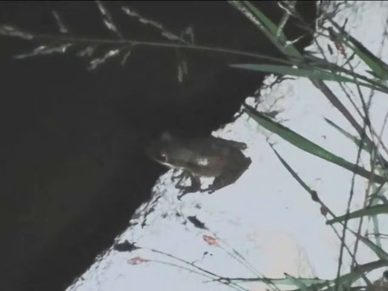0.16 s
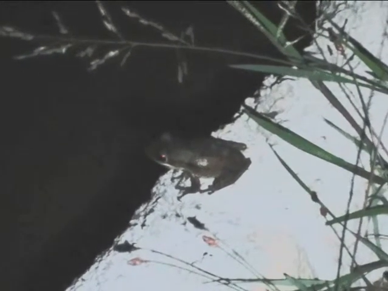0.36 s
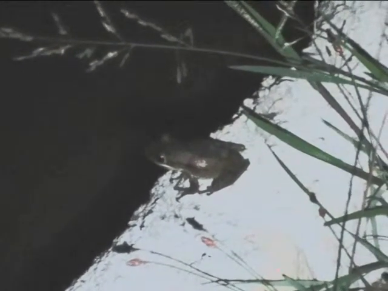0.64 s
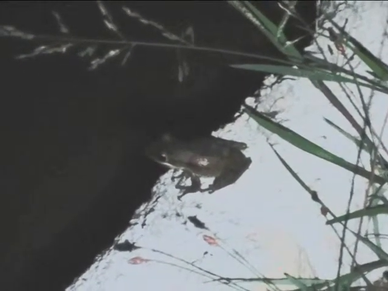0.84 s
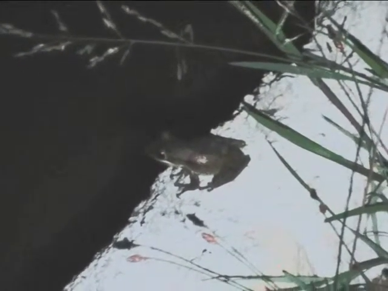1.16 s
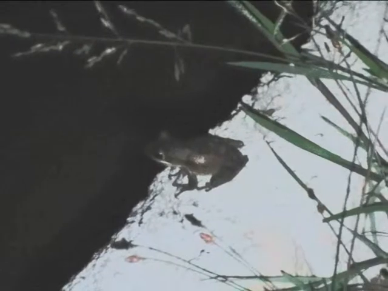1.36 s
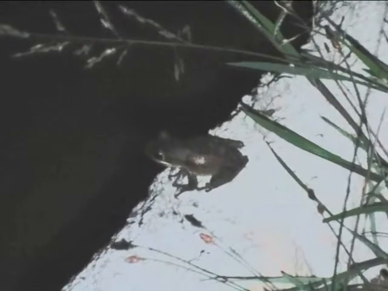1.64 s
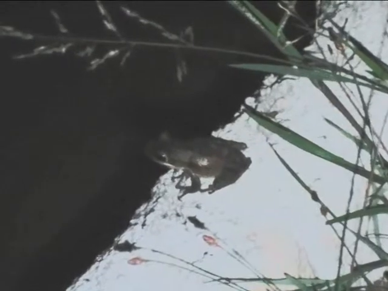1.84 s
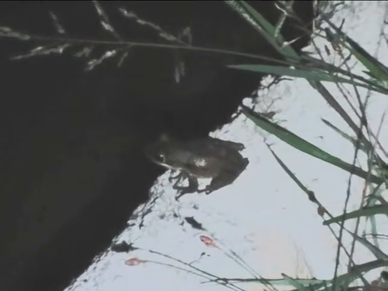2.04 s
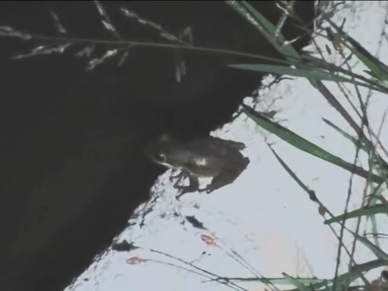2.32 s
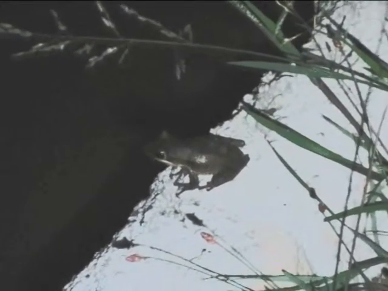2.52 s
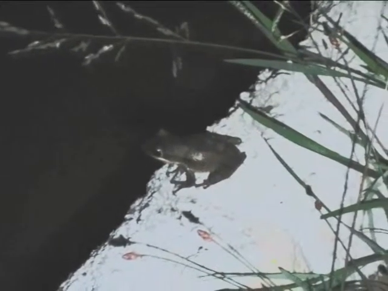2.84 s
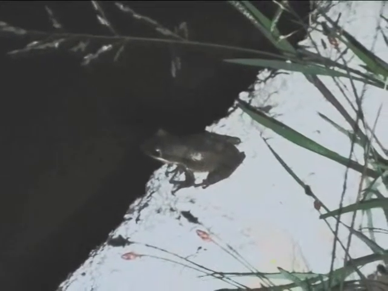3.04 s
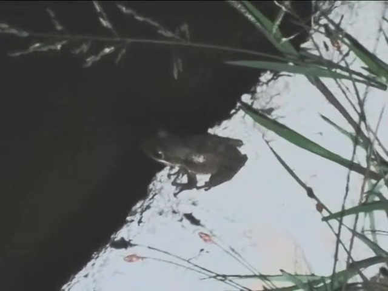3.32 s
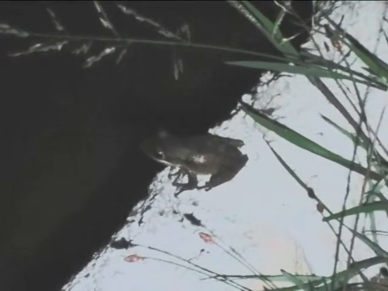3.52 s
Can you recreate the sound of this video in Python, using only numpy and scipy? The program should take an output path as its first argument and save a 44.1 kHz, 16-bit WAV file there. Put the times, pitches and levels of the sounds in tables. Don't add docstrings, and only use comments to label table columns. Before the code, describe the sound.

Loud, shrill, fast-pulsed frog trill over short rattling croaks and a hissing night chorus

```python
import sys
import numpy as np
from scipy import signal
from scipy.io import wavfile
from scipy.ndimage import uniform_filter1d

SR = 44100
rng = np.random.default_rng(int(sys.argv[2]) if len(sys.argv) > 2 else 0)


def voltage_ratio(level):
    return 10 ** (np.asarray(level, float) / 20)


def bounce(signal):
    frames = np.transpose(np.atleast_2d(signal))
    limited = np.clip(frames, -1, 1)
    pcm = np.round(limited * 32767).astype(np.int16)
    wavfile.write(sys.argv[1], SR, pcm)


N = 162288


def evened(x):
    return x / np.sqrt(np.mean(x ** 2) + 1e-20)


def add(mix, start_s, sound):
    part = mix[max(round(start_s * SR), 0):][:len(sound)]
    part += sound[:len(part)]


def resonate(x, hz, width_hz):
    turn = np.exp(2j * np.pi * np.cumsum(hz * np.ones(len(x))) / SR)
    r = np.exp(-np.pi * width_hz / SR)
    at_zero_hz = x / turn + 1e-18
    return 2 * (turn * signal.lfilter([(1 - r) ** 2], [1, -2 * r, r * r], at_zero_hz)).real


def place(x, pan_db, wet_db, t60):
    t = np.arange(8000) / SR
    tail = rng.standard_normal((2, 8000)) * voltage_ratio(-60 * t / t60) * (t > .003)
    wet = signal.fftconvolve(x[None], tail / np.linalg.norm(tail[0]), axes=1)[:, :N]
    return x * voltage_ratio(np.array([[pan_db / 2], [-pan_db / 2]])) + voltage_ratio(wet_db) * wet


RISE_MS = 2.81

# (t/ms, level/dB, f/Hz)
PULSE_SHAPE = [(-17, -4.6, 3610), (-13, -3.5, 3540), (-8, 0, 3445), (-4.6, -1.2, 3355), (-1.5, -4.9, 3260),
               (.3, -11, 3140), (3.2, -12, 3175), (5.4, -25, 3210), (9.5, -45, 3250)]
# (band f/Hz, width/Hz, peak level/dB, skirt level/dB)
SAC_BANDS = [
    (6480, 170, -21, -52),
    (10300, 300, -28.5, -45),
    (13500, 700, -36, -42),
]


def whistle(level_db, ratio, onset_ms, rise_ms):
    ms = np.arange(-25 * SR // 1000, 10 * SR // 1000) * 1000 / SR
    at, db, hz = np.transpose(PULSE_SHAPE)
    since = np.maximum(ms - onset_ms, 0)
    hook_hz = 192 * ratio ** 40 * np.exp(-since / 1.76)
    hz = ratio * np.interp(ms, at, hz) + hook_hz
    turns = 2 * np.pi * (np.cumsum(hz) / SR + rng.random())
    tone = np.sin(turns)
    before_fall = np.clip(2.3 - ms, 0, 1)
    for k, (band_hz, width, peak_db, skirt_db) in enumerate(SAC_BANDS, 2):
        band = np.exp(-.5 * ((k * hz - band_hz) / width) ** 2)
        tone += (voltage_ratio(skirt_db) + voltage_ratio(peak_db) * band) * np.sin(k * turns) * before_fall
    rise = np.minimum(since / rise_ms, 1) ** 1.3
    swell = voltage_ratio(uniform_filter1d(np.interp(ms, at, db), size=30))

    air = rng.standard_normal(len(ms))
    air = voltage_ratio(-20) * resonate(air, 5000, 4400) + voltage_ratio(-36) * np.diff(air, prepend=0)
    snap_db = 1.8 * (RISE_MS - rise_ms)
    tick = voltage_ratio(snap_db + 1.5 * rng.standard_normal()) * air * since * np.exp(-since / 1.45)
    echo = voltage_ratio(-43) * np.exp(-((ms - 6.6) / 2.4) ** 2) * np.sin(2 * np.pi * 13000 * ms / 1000)
    return voltage_ratio(level_db) * (rise * swell * tone + tick + echo)


def grit(x):
    level = np.sqrt(abs(uniform_filter1d(x ** 2, size=900)))
    level *= voltage_ratio(3.5 * evened(uniform_filter1d(rng.standard_normal(N), size=200)))
    noise = rng.standard_normal(N) + 0.33 * rng.standard_normal((2, N))
    bright = signal.lfilter(*signal.butter(2, [4040, 12700], "band", fs=SR), noise)
    return voltage_ratio(-32.5) * level * bright


# (t/s, pulse number)
TRILL_CLOCK = [(0.3301, 0), (0.4038, 2), (0.4735, 4), (0.5404, 6), (0.6089, 8), (0.6769, 10), (0.7461, 12),
               (0.8147, 14), (0.8845, 16), (0.9549, 18), (1.0247, 20), (1.0966, 22), (1.1671, 24),
               (1.2378, 26), (1.3099, 28), (1.3849, 30), (1.4594, 32), (1.5313, 34), (1.6029, 36),
               (1.6755, 38), (1.7461, 40), (1.8183, 42), (1.8897, 44), (1.9616, 46), (2.0335, 48),
               (2.1052, 50), (2.1784, 52), (2.2516, 54), (2.3256, 56), (2.3953, 58), (2.4684, 60),
               (2.5404, 62), (2.6118, 64), (2.6819, 66), (2.7529, 68), (2.8257, 70), (2.8968, 72),
               (2.9678, 74), (3.0388, 76), (3.1117, 78), (3.1839, 80), (3.2561, 82), (3.3274, 84),
               (3.4014, 86), (3.4728, 88), (3.5448, 90), (3.6178, 92), (3.6549, 93)]
# (pulse number, level/dB)
TRILL_EFFORT = [(0, -9.5), (1, -6.5), (2, -2.5), (7, -4), (18, -3.5), (23, -5.5), (25, -3.5), (66, -4),
                (76, -3.5), (79, -5.5), (80, -4), (94, -3.5)]
# (pulse number, delay t/ms)
OPENING_DELAY = [(0, 2.1), (1, 2.1), (3, 1.1), (5, 1.1), (6, 2.5), (12, 1.2), (13, 1.5), (14, 2.6),
                 (15, 0.8), (17, -1.0), (20, 1.5), (21, 0.9), (23, 1.9), (29, -1.1), (30, -1.3), (31, -1.4),
                 (32, -1.9), (33, 1.0), (36, -1.3), (42, -2.1), (43, -1.1), (44, -1.2), (46, 1.1),
                 (47, -1.3), (49, -1.1), (51, -1.6), (60, -1.6), (65, 1.5), (66, 1.9), (69, 1.5), (73, 1.2),
                 (74, 1.5), (86, 1.9), (87, -1.0), (90, -1.2), (93, -0.9)]


def trill():
    s, number = np.transpose(TRILL_CLOCK)
    k = np.arange(95)
    past_end = s[-1] + (k - number[-1]) / 28
    times = np.where(k > number[-1], past_end, np.interp(k, number, s))
    effort_db = np.interp(k, *np.transpose(TRILL_EFFORT))
    chance, out = rng.standard_normal((95, 4)), np.zeros(N)
    delays = dict(OPENING_DELAY)
    for i in k:
        time_luck, level_luck, onset_luck, pitch_luck = chance[i]
        late_ms = delays.get(i, np.clip(onset_luck, -2, 2))
        flat = 0.0373 * np.exp(-i / 1.4)
        ratio = (1 - flat) * (1 + 0.0039 * pitch_luck)
        rise_ms = max(RISE_MS - late_ms * (i > 1) + 3 * (i < 2), .8)
        pulse = whistle(effort_db[i] + .35 * level_luck, ratio, -21 + late_ms, rise_ms)
        add(out, times[i] + .0012 - 25 / 1000 + 0.0003 * time_luck, pulse)
    return place(out, -0.72, -23, 0.17) + grit(out)


def croaks(calls, body, first_gap, lead_db, arch_db, peak_at, rough, double):
    out = np.zeros(N)
    for s, db, per_s, length in calls:
        count = round(length * per_s)
        k, chance = np.arange(count), rng.standard_normal((20, 4))[:count]
        at = (k - first_gap * (k > 1) + .04 * chance[:, 0] * (k > 2)) / per_s
        click_db = -arch_db * (k / (count - 1) - peak_at) ** 2 + 1.75 * chance[:, 1]
        click_db += lead_db * (k == 0) - 6.5 * (k == count - 1)
        clicks = voltage_ratio(click_db)
        drive = np.zeros(9000)
        drive[(at * SR).astype(int)] = clicks
        second = ((at + .004 + .0008 * chance[:, 2]) * SR).astype(int)
        drive[second] = double * clicks * np.clip(chance[:, 3], -1.3, 1.3)
        breath = rng.standard_normal(9000) * uniform_filter1d(abs(drive), size=300, origin=140) * 18
        edge = np.diff(drive, prepend=0) * 4
        drive = edge + drive - uniform_filter1d(drive, size=60) + rough * breath

        along = np.minimum(np.arange(9000) / (at[-1] * SR), 1)
        call = np.zeros(9000)
        for j, (hz, width, g_db, glide, fade_db) in enumerate(body):
            ring = resonate(drive, hz * (1 + (glide - 1) * along), width) / width
            call += (-1) ** j * voltage_ratio(g_db + fade_db * along) * ring
        add(out, s - 1 / per_s, voltage_ratio(db + 3.5) * call / abs(call).max())
    return out


# (first pulse t/s, level/dB, pulse rate f/Hz, length t/s)
SHARP_CALLS = [
    (0.5355, -14, 92, .115),
    (1.3875, -14.5, 95, 0.14),
    (1.7695, -14, 92, .13),
    (2.1621, -14, 82, .13),
    (2.6694, -15, 94, .13),
    (3.0424, -13, 103, .127),
    (3.5337, -14.5, 99, .127),
]
# (f/Hz, width/Hz, level/dB, glide ratio, level change over the call/dB)
SHARP_THROAT = [
    (1323, 413, 7, 1.064, -8),
    (1770, 243, 1, 1.083, 4),
    (867, 156, -3.5, 0.944, -16),
]


def sharp_croaker():
    return croaks(SHARP_CALLS, SHARP_THROAT, first_gap=0.249, lead_db=-5.5, arch_db=17.5, peak_at=0.55,
                  rough=.15, double=.12)


# (first pulse t/s, level/dB, pulse rate f/Hz, length t/s)
RINGING_CALLS = [
    (0.41, -17, 79, 0.11),
    (0.8694, -19, 86, 0.13),
    (1.241, -18.5, 81, 0.12),
    (1.5673, -18.5, 82, 0.12),
    (1.9754, -18.5, 84, 0.12),
    (2.526, -18, 76, 0.12),
    (2.841, -18, 75, 0.12),
    (3.211, -18, 80, 0.12),
]
# (f/Hz, width/Hz, level/dB, glide ratio, level change over the call/dB)
RINGING_THROAT = [
    (1342, 404, 6, 0.99, -3),
    (1764, 112, 2.4, 1.01, 2),
    (781, 128, 0.5, 1.187, -14),
    (1950, 480, -8, 1.088, 14),
]


def ringing_croaker():
    return croaks(RINGING_CALLS, RINGING_THROAT, first_gap=0.15, lead_db=-7.5, arch_db=24, peak_at=0.43,
                  rough=.15, double=.1)


# (first pulse t/s, level/dB, pulse rate f/Hz, length t/s)
HOARSE_CALLS = [
    (.986, -11.5, 80, 0.15),
]
# (f/Hz, width/Hz, level/dB, glide ratio, level change over the call/dB)
HOARSE_THROAT = [
    (1330, 580, 3, 1.09, -2.5),
    (1750, 280, -1.5, 1.08, 1.5),
    (2120, 280, -12, 1.057, 8.5),
    (686, 370, -1, 0.65, -17.5),
]


def hoarse_croaker():
    return croaks(HOARSE_CALLS, HOARSE_THROAT, first_gap=0.38, lead_db=-11, arch_db=28, peak_at=0.7,
                  rough=.45, double=.65)


# (t/s, level/dB)
CLUCK_TIMES = [
    (0.2, -12),
    (2.356, -12),
]
# (delay t/s, level/dB)
CLUCK_RATTLE = [
    (0.0526, -12),
    (.0015, 6.5),
    (.0072, 3),
    (.011, -3),
    (.0188, 2),
    (.0225, -1),
    (.0265, -0.5),
    (.0365, -8),
    (0.04, -6),
    (.0452, -5.5),
]
# (f/Hz, width/Hz, level/dB)
CLUCK_THROAT = [
    (674, 134, -7.5),
    (945, 400, -4),
    (1400, 360, 4),
    (1925, 150, -10),
]


def clucks():
    out, drive = np.zeros(N), np.zeros(5000)
    for s, db in CLUCK_RATTLE:
        add(drive, s, voltage_ratio(db) * np.ones(1))
    for s, db in CLUCK_TIMES:
        breath = rng.standard_normal(5000) * uniform_filter1d(drive, size=400, origin=190) * 4
        rattle = drive + 1.8 * breath
        call = np.zeros(5000)
        for k, (hz, width, g_db) in enumerate(CLUCK_THROAT):
            call += (-1) ** k * voltage_ratio(g_db) * resonate(rattle, hz, width) / width
        add(out, s, voltage_ratio(db + 4.0) * call / abs(call).max())
    return place(out, -2.3, -9.5, 0.086)


# (t/s, level/dB, f/Hz, width/Hz)
WATER_KNOCKS = [(.956, 4.5, 1950, 300), (.958, -5.5, 1660, 100), (.97, -6, 1900, 240),
                (.977, -24, 2300, 300), (1.448, -33.5, 810, 13), (1.47, -27, 817, 18), (.73, -42, 487, 110),
                (2.334, -37, 610, 130), (1.237, -41, 517, 110), (.52, -24.5, 620, 150),
                (.546, -17, 587, 150), (0.571, -22, 590, 140), (.986, -27, 586, 130),
                (1.008, -33, 507, 140), (1.029, -23, 585, 140), (1.252, -24, 624, 130),
                (1.266, -25, 575, 110), (1.278, -22.5, 600, 130), (1.331, -22.5, 530, 66),
                (1.607, -32.5, 530, 72), (1.686, -28, 516, 91), (1.761, -26, 500, 105),
                (1.835, -24, 515, 104), (2.105, -32.5, 630, 73)]


def knocks():
    out, t = np.zeros(N), np.arange(3000) / SR
    for s, db, hz, width in WATER_KNOCKS:
        upper = 0.5 * np.exp(-t / 0.0045) * np.sin(2 * np.pi * 1.283 * hz * t)
        ring = np.sin(2 * np.pi * hz * t) + upper
        rise = np.minimum(t / 0.0011, 1) ** 2
        add(out, s, voltage_ratio(db + 1.5) * rise * np.exp(-np.pi * width * t) * ring)
    return place(signal.lfilter(*signal.butter(2, 330, "high", fs=SR), out), -1.7, -15, 0.17)


# (t of a pulse/s, pulse rate f/Hz, level/dB, f/Hz, pulse width as share of the period)
FAR_FROGS = [
    (0.0243, 26.2, -26.5, 3420, 0.15),
    (0.01743, 22, -21, 3330, 0.026),
]


def far_trill():
    t, tone = np.arange(N) / SR, 0
    for s, per_s, db, hz, share in FAR_FROGS:
        cycle = ((t - s) * per_s + .5) % 1 - .5
        falling = np.sin(2 * np.pi * np.cumsum(hz - 450 * cycle) / SR)
        tone = tone + voltage_ratio(db) * np.exp(-(cycle / share) ** 2) * falling
    return place(tone, 0.55, -4.0, 0.046)


# (t/s, length t/s, level/dB)
RASP_CALLS = [
    (.3, 0.23, -35.5),
    (0.848, 0.14, -40),
    (2.025, 0.14, -37),
    (3.195, 0.3, -37),
]


def rasps():
    out = np.zeros(N)
    for s, length, db in RASP_CALLS:
        t = np.arange(0, length, 1 / SR)
        puffs = (0.15 + np.exp(-(t * 56 % 1) / 0.22)) * rng.standard_normal(len(t))
        swell = np.sin(np.pi * t / length) ** 0.38
        add(out, s, voltage_ratio(db) * swell * evened(resonate(puffs, 2640, 650)))
    return place(out, .3, -7.5, 0.075)


def cricket():
    start_s, every_s, buzz_s = 0.14, .3595, 0.23
    u = (np.arange(N) / SR - start_s) % every_s
    per_s = np.interp(u, [0, .05, .08], [110, 110, 165])
    strokes_done = np.cumsum(per_s * (1 + 1.6 * rng.standard_normal(N))) / SR
    strokes = np.maximum(np.diff(np.floor(strokes_done), prepend=0), 0)
    strokes = strokes * (u < buzz_s) * np.minimum(0.27 + u / 0.12, 1)
    strokes = strokes * voltage_ratio(1.2 * rng.standard_normal(N))
    return place(voltage_ratio(-50) * evened(resonate(strokes, 7270, 240)), -0.48, -1.5, 0.053)


# (f/Hz, level per Hz/dB)
POND_HISS = [
    (110, -21.5),
    (300, -19),
    (1300, -12),
    (2200, -10),
    (4000, -13),
    (9000, -33.5),
    (12000, -28),
    (15500, -51),
]
# (f/Hz, width/Hz, level/dB)
CHORUS_BANDS = [
    (307, 70, -54.5),
    (1790, 200, -38.5),
    (2740, 1200, -41),
    (3140, 245, -41.5),
    (8930, 1050, -53),
]


def night():
    frames, hz = N // 128 + 5, np.fft.rfftfreq(512, 1 / SR)
    a, b, c, d, patches = rng.standard_normal((frames, 257, 5)).T
    patches = uniform_filter1d(patches, size=6, axis=0)
    patches = evened(uniform_filter1d(patches, size=14, axis=1))
    f, db = np.transpose(POND_HISS)
    floor = voltage_ratio(np.interp(np.log(hz + 1), np.log(f), db))
    floor *= voltage_ratio(-36.5) / np.linalg.norm(floor)
    for band_hz, width, band_db in CHORUS_BANDS:
        bump = np.exp(-((hz - band_hz) / width) ** 2)
        floor = np.hypot(floor, voltage_ratio(band_db) * bump / np.linalg.norm(bump))
    same = np.clip(np.interp(hz, [150, 400, 1000, 4000], [.45, .75, .95, .96]), 0, 1)[:, None]
    left = a + 1j * b
    z = np.array([left, same * left + np.sqrt(1 - same ** 2) * (c + 1j * d)])
    z *= floor[:, None] * voltage_ratio(3.13 * np.clip(hz / 500, .2, 1)[:, None] * patches)
    hiss = signal.istft(z, nperseg=512, noverlap=384)[1][:, :N]
    return hiss * voltage_ratio(np.array([[-.6], [.1]]))


def scene():
    sharp, ringing, hoarse = sharp_croaker(), ringing_croaker(), hoarse_croaker()
    trills = trill() + far_trill()
    croakers = place(sharp, 0.14, -12.5, 0.034) + place(ringing, .1, -12.5, 0.25) + place(hoarse, .1, -7.5, 0.03)
    return trills + croakers + clucks() + knocks() + cricket() + night() + rasps()


def low_pass(x):
    return signal.sosfilt(signal.butter(12, 15690, fs=SR, output="sos"), x)


def record(dry):
    thin = signal.lfilter(*signal.butter(4, 79, "high", fs=SR), dry)
    band = signal.oaconvolve(thin, signal.firwin(255, 15200, fs=SR)[None], "same")
    return low_pass(band)


dry = scene()
out = record(dry)
bounce(out)
```